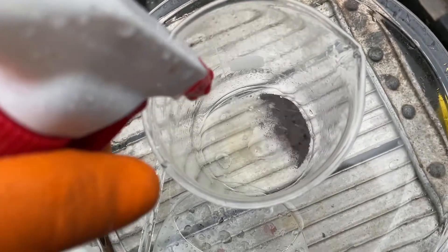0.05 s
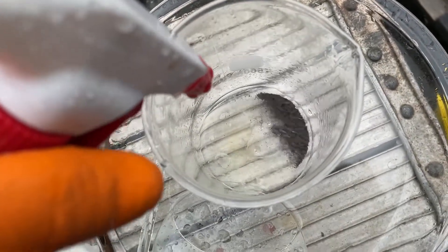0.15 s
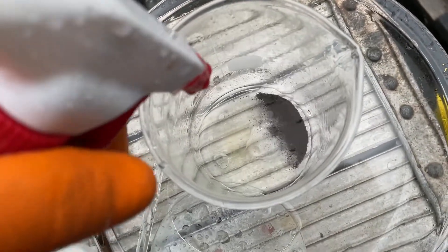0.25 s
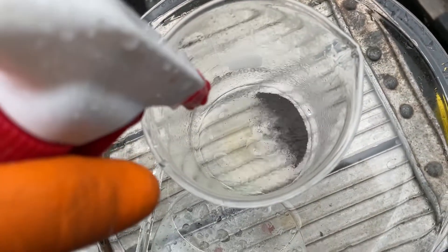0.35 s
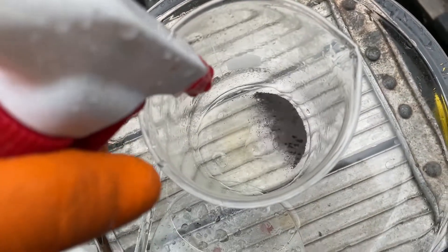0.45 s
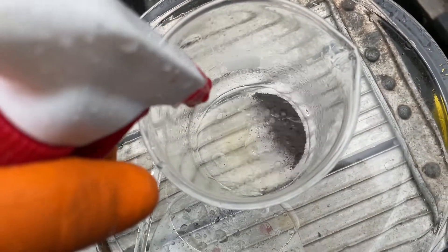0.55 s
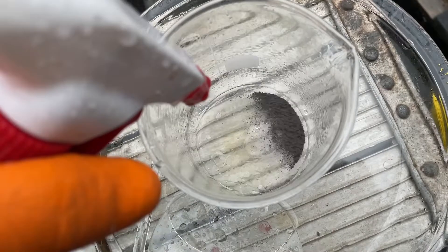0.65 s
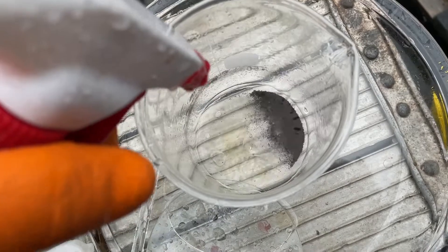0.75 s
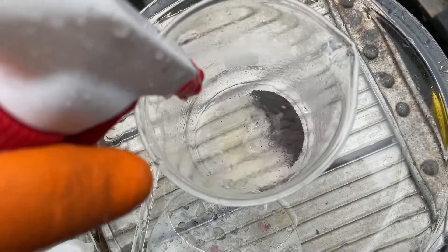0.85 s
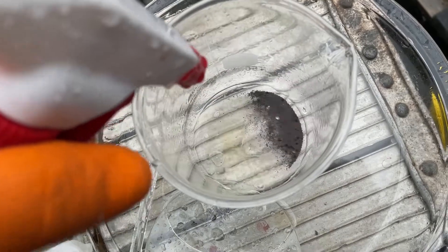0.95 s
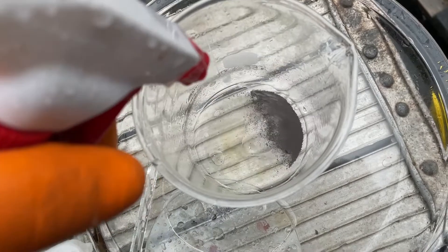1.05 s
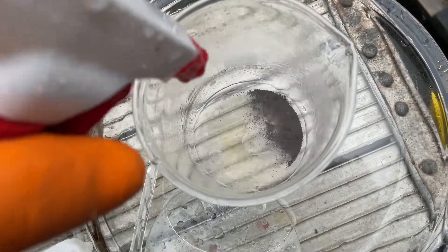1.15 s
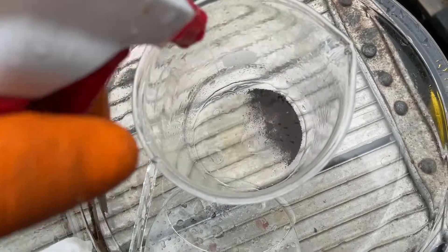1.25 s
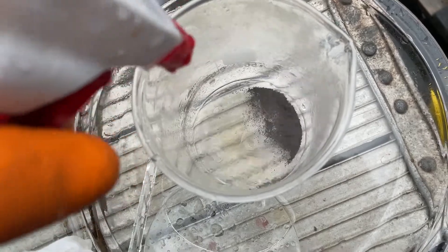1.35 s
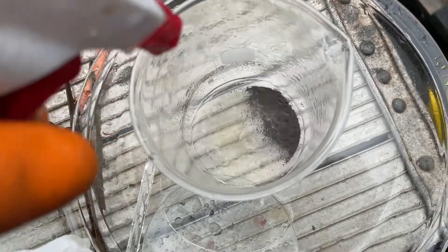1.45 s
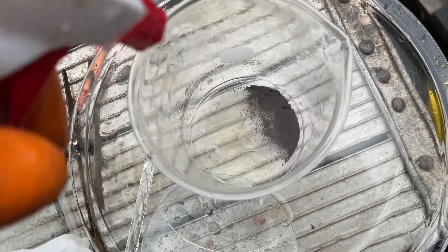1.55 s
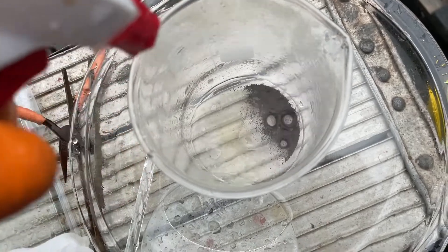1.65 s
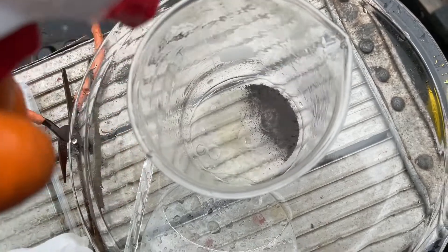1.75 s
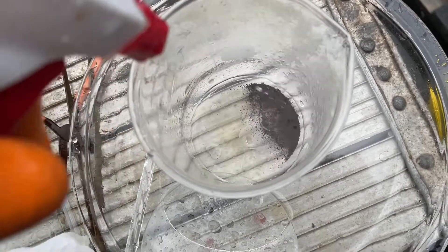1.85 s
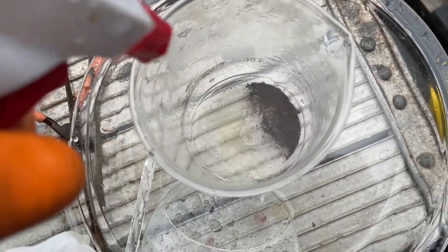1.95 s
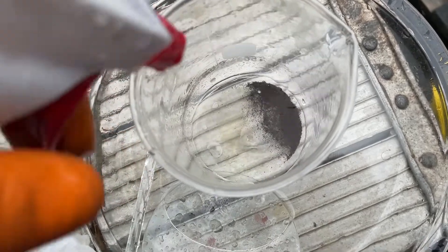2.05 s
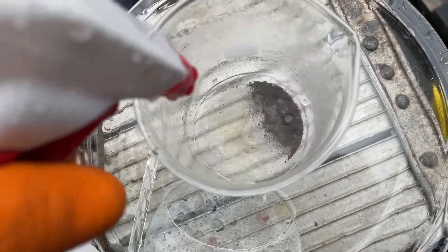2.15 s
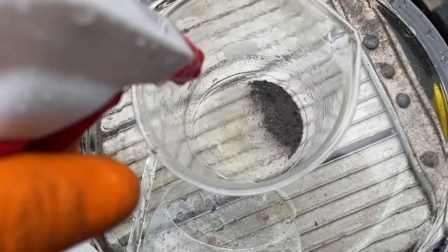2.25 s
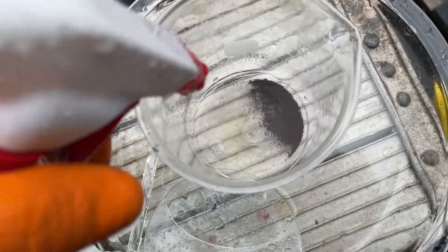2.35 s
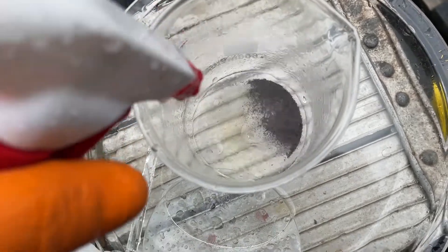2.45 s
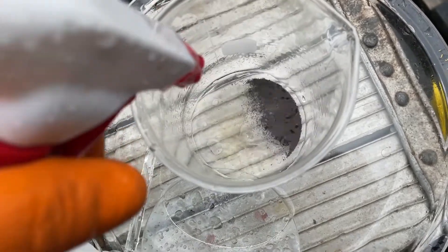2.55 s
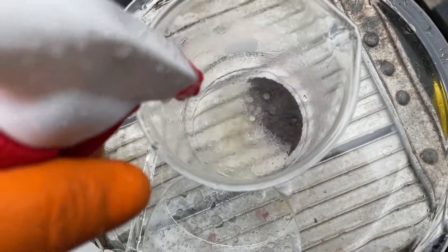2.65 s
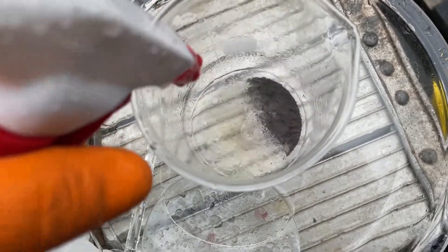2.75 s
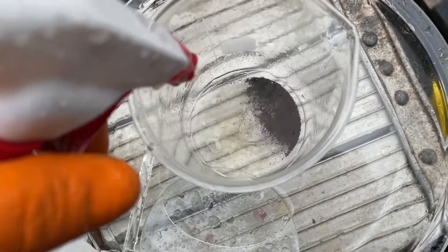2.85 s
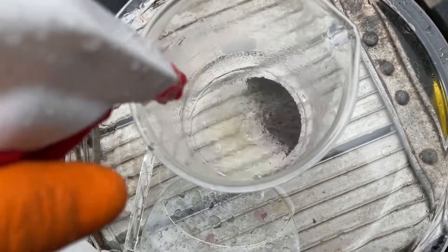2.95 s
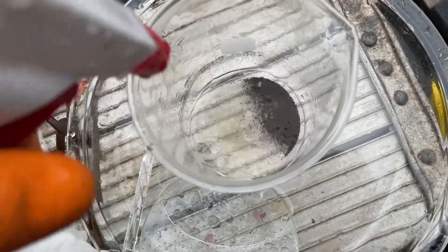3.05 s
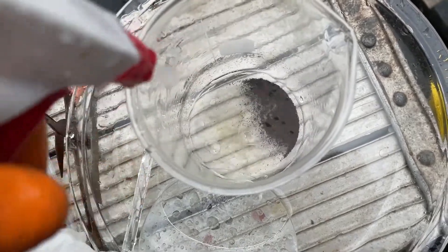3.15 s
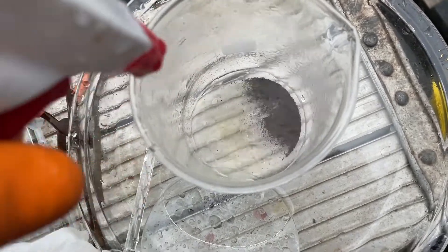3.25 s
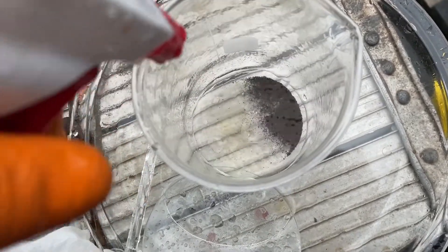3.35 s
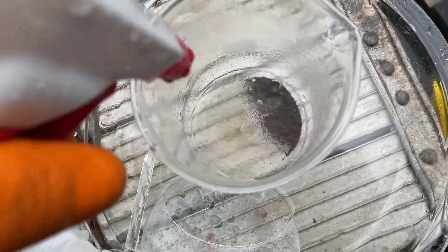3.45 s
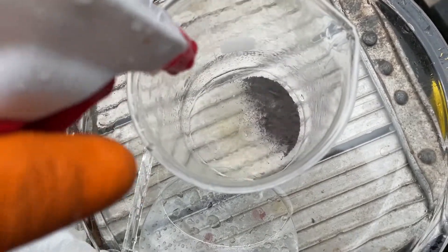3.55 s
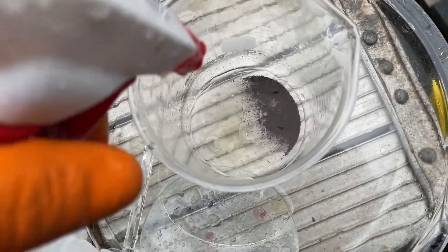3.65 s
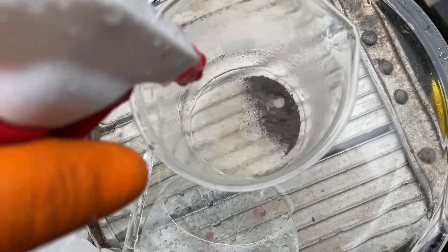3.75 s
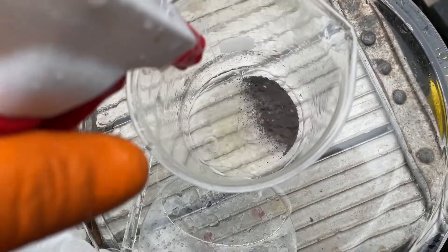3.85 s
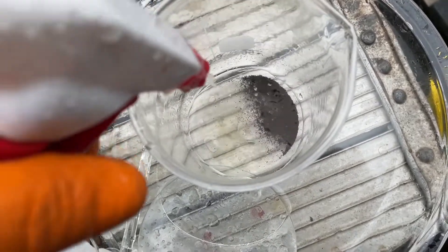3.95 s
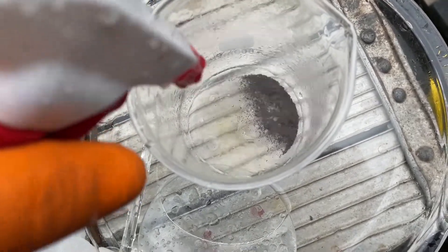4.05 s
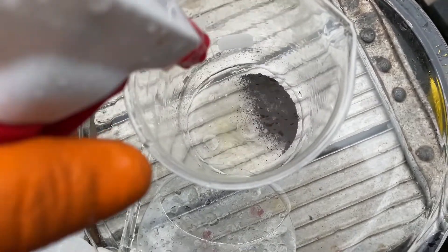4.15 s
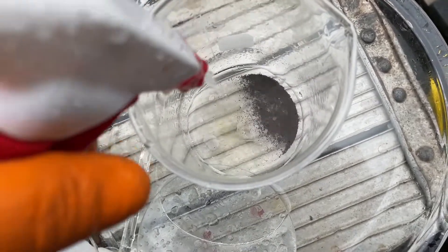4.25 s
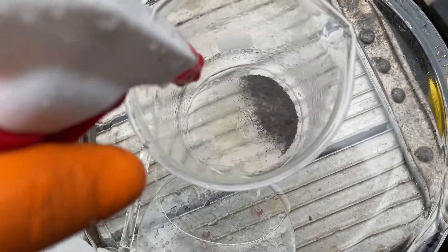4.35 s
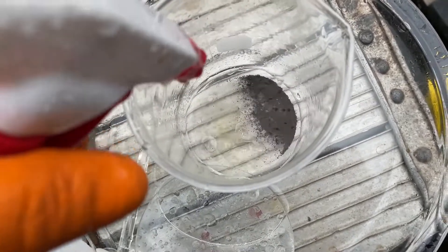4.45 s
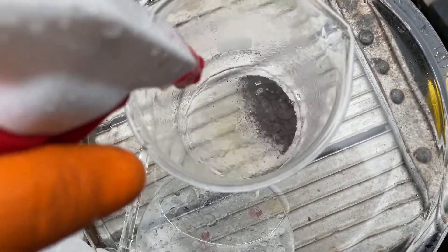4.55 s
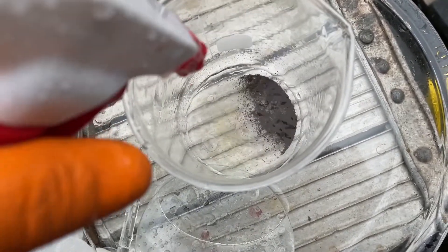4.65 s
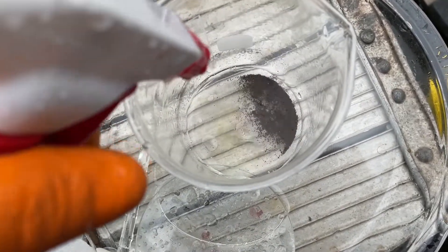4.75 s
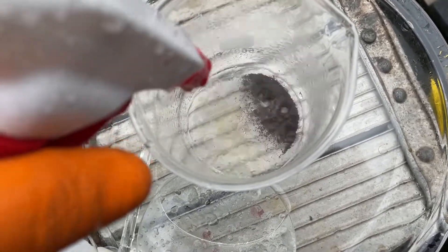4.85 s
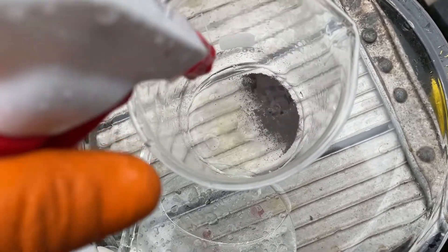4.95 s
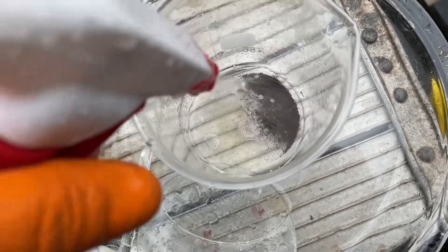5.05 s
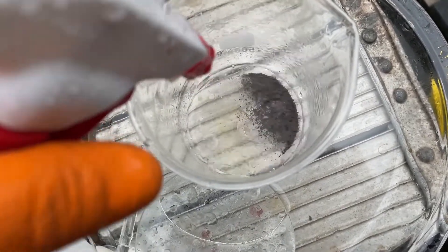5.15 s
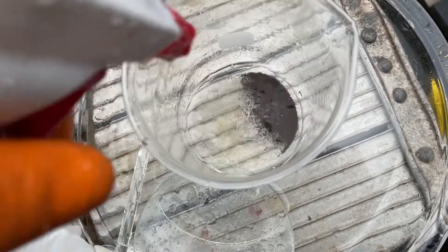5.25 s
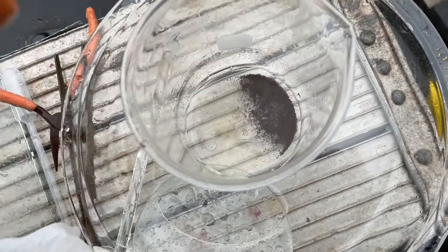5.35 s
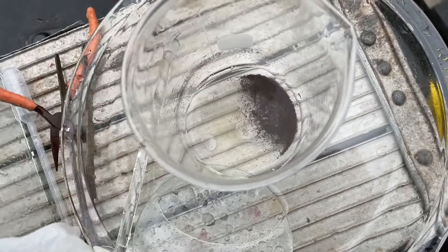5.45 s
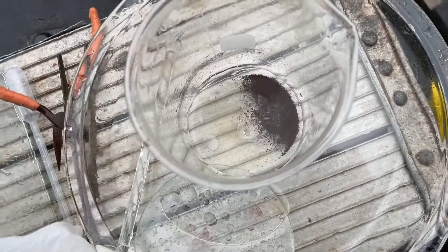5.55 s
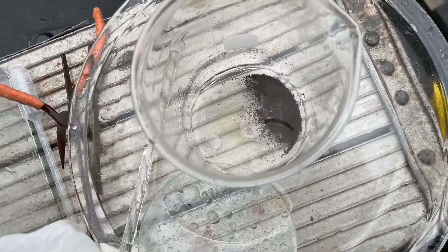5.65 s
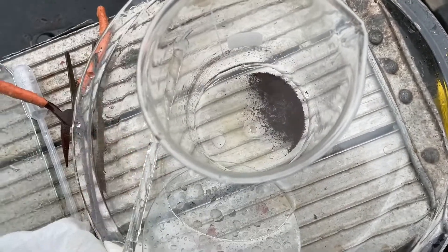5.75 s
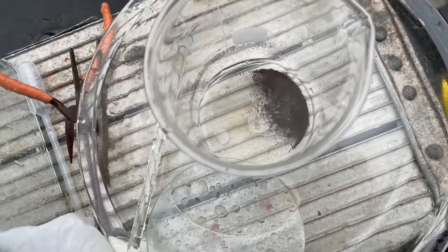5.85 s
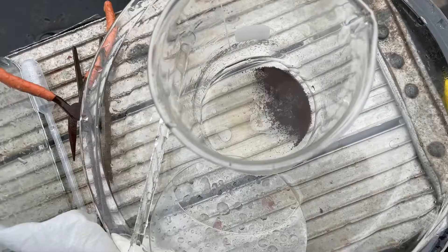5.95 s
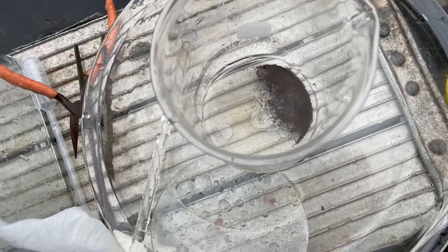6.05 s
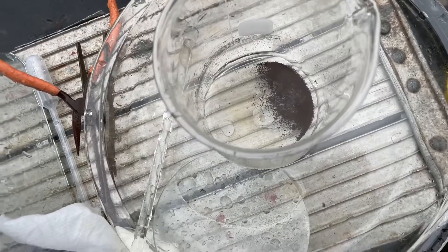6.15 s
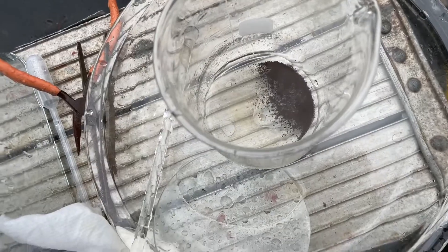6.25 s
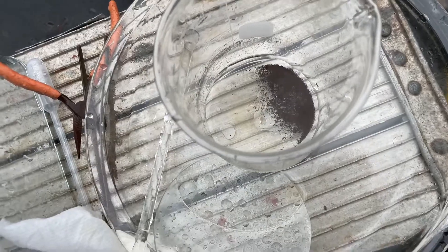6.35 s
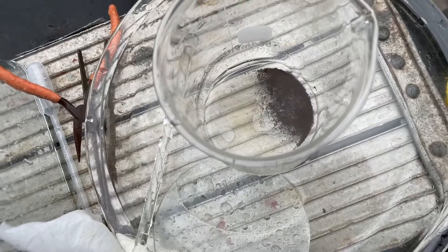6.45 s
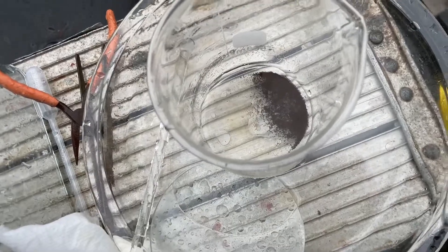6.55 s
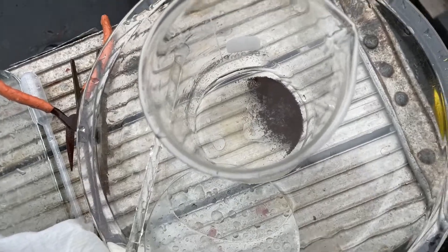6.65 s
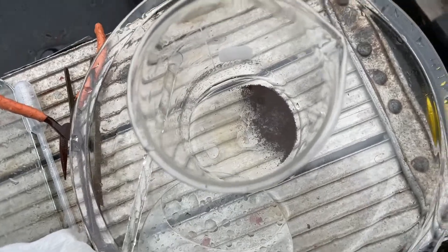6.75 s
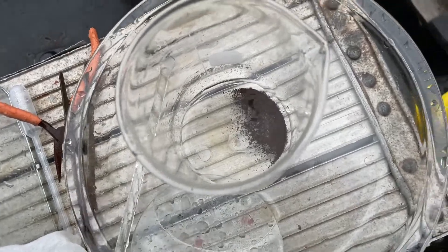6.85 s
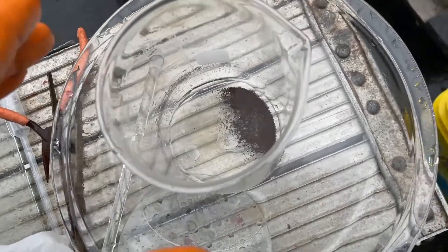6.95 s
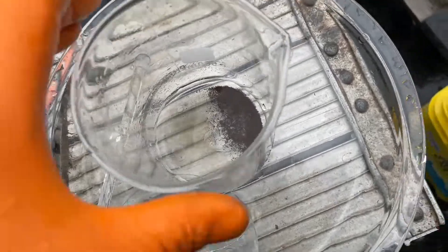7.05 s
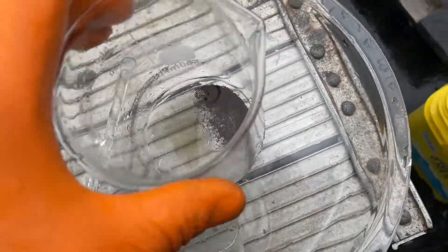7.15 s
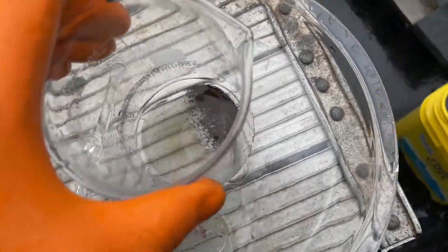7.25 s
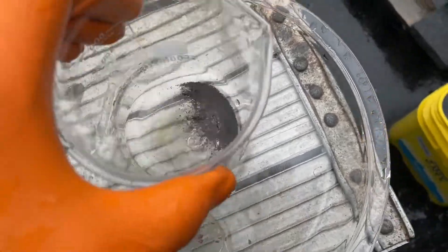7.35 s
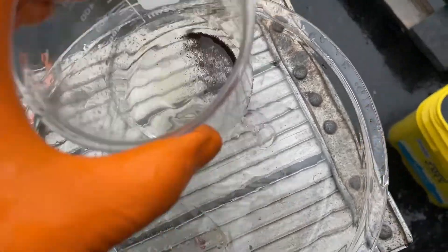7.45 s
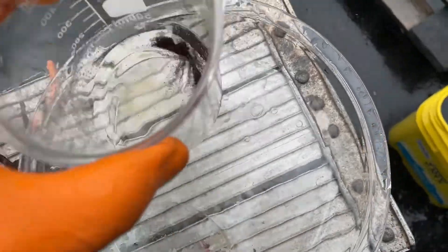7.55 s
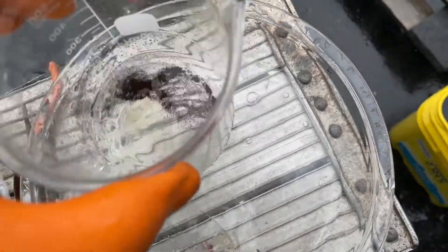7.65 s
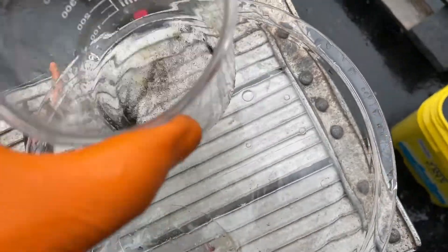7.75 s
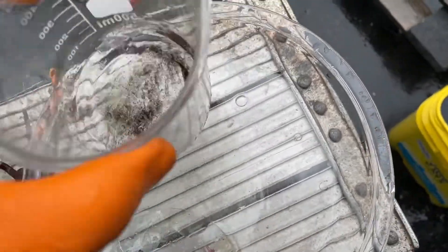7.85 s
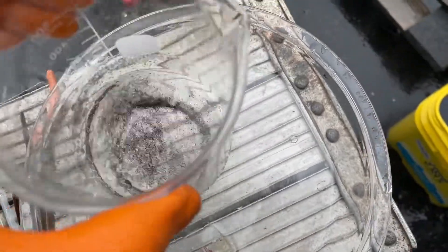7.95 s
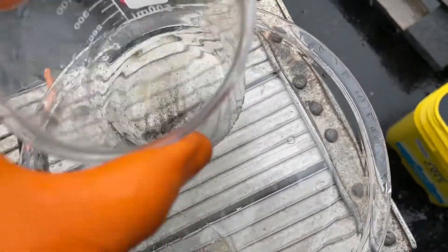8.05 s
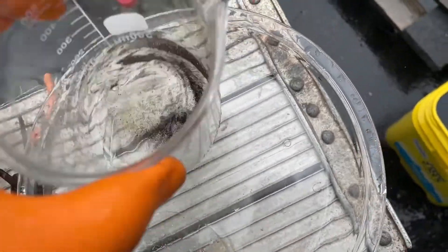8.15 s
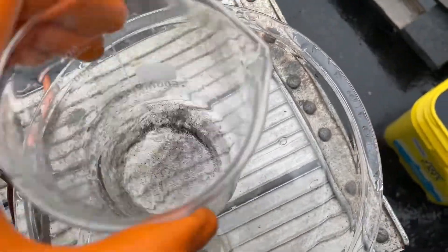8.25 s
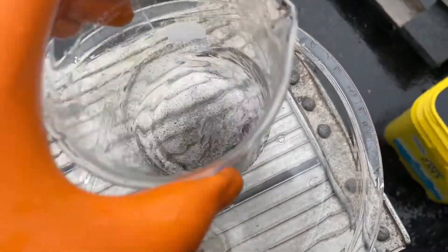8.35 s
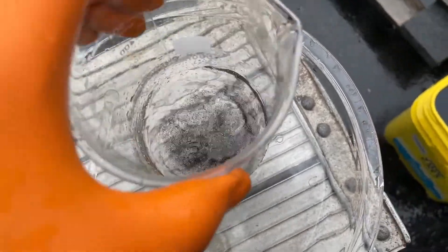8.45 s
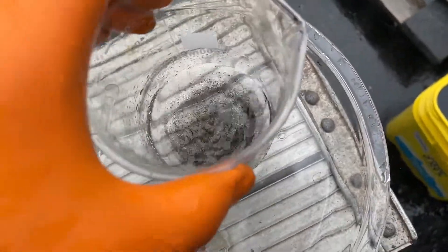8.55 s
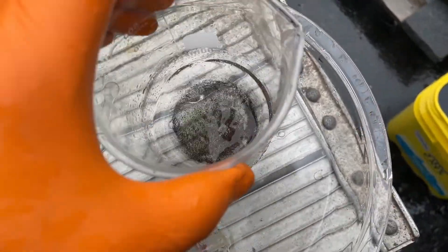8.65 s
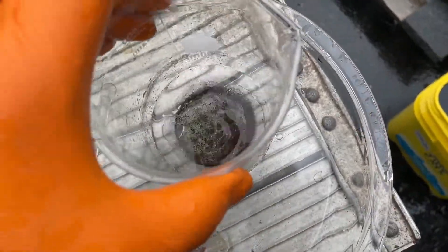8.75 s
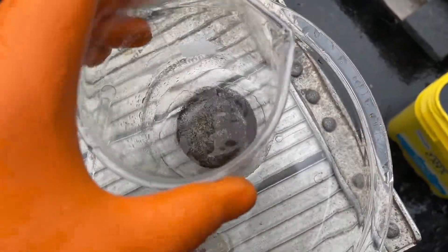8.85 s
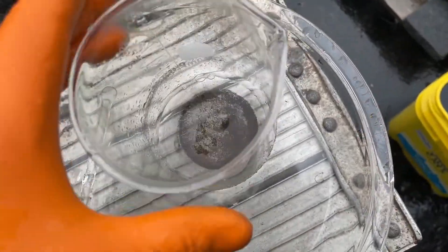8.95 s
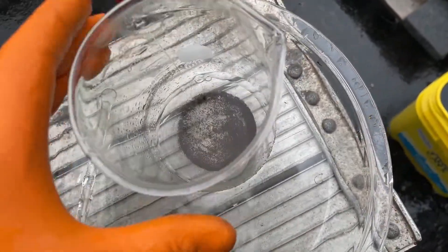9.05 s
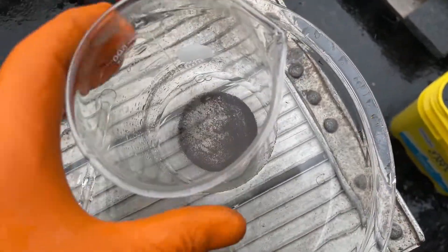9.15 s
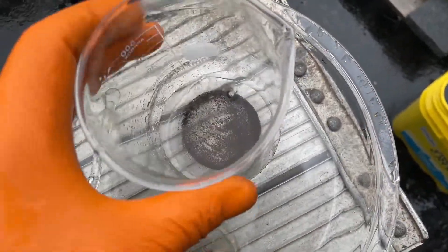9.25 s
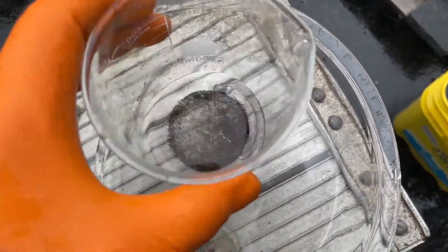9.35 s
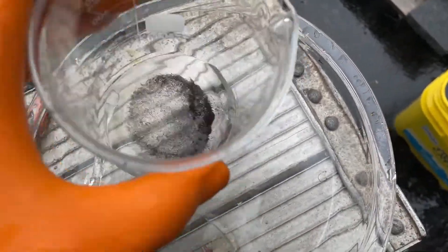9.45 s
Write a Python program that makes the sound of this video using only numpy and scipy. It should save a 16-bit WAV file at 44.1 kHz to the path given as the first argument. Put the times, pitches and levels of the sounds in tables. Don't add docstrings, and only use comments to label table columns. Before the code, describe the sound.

Outdoors with a handheld microphone nearby, fast regular spray bursts fill the first five seconds, hiss mixed with squeaky stick-slip friction, hollow plastic buzz and small clicks. A dull bump on the microphone comes near the end of the spraying. Then a loud clunk and rattle of the bottle on metal, quiet handling ticks, a hard glass knock, and another as the beaker is put down and settles. Low distant traffic continues.

```python
import sys
import numpy as np
from scipy import signal
from scipy.fft import rfft, irfft, next_fast_len
from scipy.io import wavfile
from scipy.ndimage import map_coordinates

SR = 44100
rng = np.random.default_rng(int(sys.argv[2]) if len(sys.argv) > 2 else 0)


def bounce(signal):
    frames = np.transpose(np.atleast_2d(signal))
    limited = np.clip(frames, -1, 1)
    pcm = np.round(limited * 32767).astype(np.int16)
    wavfile.write(sys.argv[1], SR, pcm)


def level_to_linear(level):
    exponent = np.asarray(level, float) / 20
    return 10 ** exponent


N = 418509
TIME = np.arange(N) / SR
SPRAY_N = round(5.5 * SR)

# break-away slip t/s, jet level/dB, bottle drone level/dB, break-away level/dB, push length/s
STROKES = [(0.216, -17, -25.5, -14, 0.081), (0.475, -16, -26.5, -14, 0.075),
           (0.728, -18, -25.5, -14.5, 0.068), (0.9711, -14.5, -25, -14, 0.076),
           (1.232, -15, -25.5, -10.5, 0.077), (1.5011, -15.5, -25, -11.5, 0.083),
           (1.7615, -16, -24.5, -11.5, 0.075), (2.0168, -14.5, -25, -12.5, 0.078),
           (2.284, -15.5, -27, -11.5, 0.072), (2.5454, -15.5, -26.5, -15, 0.069),
           (2.8076, -15.5, -26, -13, 0.066), (3.08, -15, -27, -12.5, 0.076),
           (3.3444, -15.5, -26, -12, 0.085), (3.6195, -16, -24.5, -13, 0.079),
           (3.885, -16, -26, -13, 0.077), (4.183, -17, -26.5, -12.5, 0.074),
           (4.4416, -17.5, -27.5, -13, 0.066), (4.704, -15.5, -27, -11.5, 0.062),
           (4.975, -15.5, -26, -13.5, 0.063)]
LAST_SLIP = [.053, .051, .052, .054, .053, .055, .058, .053, .053, .05, .05, .051, .053, .053, .051, .051,
             .049, .047, .046, .052, .052]
USUAL_S = 0.052
# f/Hz, likeness
NEAR = [(200, .96), (900, .88), (1700, .5), (2300, .8), (3000, .55), (3800, .78), (5000, .45), (5900, .85),
        (7300, .7), (7700, 1), (8700, 1), (9000, .84), (10900, .84), (11200, 1), (12200, 1), (12500, .78),
        (14000, .82), (14400, 1)]
# f/Hz, left lead/rad
ROUND_BODY = [(0, 0), (900, .7), (1550, 3.1), (2000, 5.3), (3100, 7.2), (4000, 6.6), (5800, 6.28)]


def unit(x):
    return x / np.sqrt(np.mean(x ** 2) + 1e-20)


def along(points, hz):
    f, v = np.transpose(points)
    return np.interp(np.log(hz + 1), np.log(f + 1), v)


def wobble(rate):
    knots = rng.standard_normal(int(N * rate / SR) + 4)
    return map_coordinates(knots, [TIME * rate])


def swells(rows):
    return sum(db * np.exp(-((TIME - s) / half) ** 2) for s, db, half in rows)


def step(t, width):
    return 0.5 + 0.5 * np.tanh(t / width)


def filtered(x, response):
    n = x.shape[-1]
    m = next_fast_len(n + 4096)
    return irfft(rfft(x, m) * response(np.fft.rfftfreq(m, 1 / SR)), m)[..., :n]


def noise(response, count=N):
    return unit(filtered(rng.standard_normal((2, count)), response))


def fresh():
    return rng.standard_normal((2, SPRAY_N))


def colour(points):
    return lambda f: level_to_linear(along(points, f))


def resonant(modes):
    def response(f):
        total = 0
        for k, (centre, width, db) in enumerate(modes):
            damping = 1j * f * width
            total = total + (-1) ** k * level_to_linear(db) * damping / (centre * centre - f * f + damping)
        return total
    return response


def steady(x):
    return unit(x / (np.abs(signal.hilbert(x)) + 0.2) ** 0.61)


def bursts(times, db, t60, rise, count):
    start = np.zeros(count)
    np.add.at(start, np.round(times * SR).astype(int), level_to_linear(db))
    t = TIME[:SR // 20]
    shape = level_to_linear(-60 * t / t60) * (1 - np.exp(-t / rise))
    return signal.fftconvolve(start, shape / shape.max())[:count]


def lead(x, points):
    f, rad = np.transpose(points)
    return filtered(x, lambda hz: np.exp(0.5j * np.interp(hz, f, rad) * [[1], [-1]]))


def spread(pair, alike, most=1):
    def mid_side_gains(hz):
        turn = np.arccos(np.clip(along(alike, hz), -1, most)) / 2
        return np.array([np.cos(turn), np.sin(turn)])
    mid, side = filtered(pair, mid_side_gains)
    return np.array([mid + side, mid - side])


def squeezes():
    partial = [
        (-.038, -18.5, -23, -15, 0.088),
        (5.224, -31, -32.5, -40, 0.034),
    ]
    jet, push, scrape, stick, grip = np.zeros((5, SPRAY_N))
    for (s, jet_db, drone_db, _, push_s), last in zip([*STROKES, *partial], LAST_SLIP):
        jet_s = push_s + 0.059
        span = slice(max(round(s * SR) - 4000, 0), round(s * SR) + SR // 4)
        t = TIME[:SPRAY_N][span] - s + 0.0022
        pressure_db = -8 * np.clip(t / jet_s, 0, 2) ** 2.44
        jet[span] += level_to_linear(jet_db - 14 + pressure_db) * step(t - 0.024, 0.02) * step(jet_s - t, 0.026)
        scrape[span] += level_to_linear(-41.5) * step(t + 0.061, 0.0044) * step(-0.015 - t, 0.013)
        since_slip = (t * USUAL_S / last - 0.031) % 0.0115
        stick[span] = np.exp(-since_slip / 0.006) * step(last + 0.011 - t, 0.003)
        grip[span] = step(t - 0.044, 0.0071)
        growth_db = 4 * np.clip(t / push_s - 0.5, -1, 0.5)
        release = step(push_s - t, 0.0051) + 0.036 * step(jet_s - t, 0.033)
        push[span] += level_to_linear(drone_db + growth_db) * step(t - 0.012, 0.0097) * release
    judder = push * (0.3 + 2.3 * stick) * level_to_linear(1.8 * wobble(160))[:SPRAY_N]
    return jet, push, judder, scrape, grip


def jet_hiss(jet):
    # f/Hz, level per Hz/dB
    jet_colour = [(300, 3), (1000, -1), (1800, 1.5), (2500, -2), (4000, -1), (6000, -0.5), (8000, 2.5),
                  (10000, 0), (12000, -5.5), (15500, -6), (16500, -50)]
    flicker = level_to_linear(1.05 * wobble(120) + 1.6 * wobble(600))[:SPRAY_N]
    return jet * flicker * noise(colour(jet_colour), SPRAY_N)


def beaker_air(jet, late):
    flicker = level_to_linear(-13 + 3.6 * wobble(25))[:SPRAY_N]
    return jet * late * flicker * noise(resonant([(601, 26, 0)]), SPRAY_N)


def bottle_wall(push, early, late):
    # f/Hz, width/Hz, level/dB
    loose_wall = [(221.3, 58, 1), (433, 52, -22.5), (493, 50, -16)]
    # f/Hz, width/Hz, level/dB
    gripped_wall = [(195, 31, -1), (312, 43, -5), (485, 42, -13)]

    def wall(modes):
        return steady(noise(lambda f: np.abs(resonant(modes)(f)) ** 1.21, SPRAY_N))
    return level_to_linear(-3.5) * push * (early * wall(loose_wall) + late * wall(gripped_wall))


def trigger_body(slip, judder):
    # f/Hz, width/Hz, level/dB
    trigger_modes = [(2428, 200, 2), (3450, 300, 2), (4180, 350, -1), (5430, 780, -7), (7050, 2300, -7)]
    return filtered((level_to_linear(8.5) * slip + level_to_linear(-0.5) * judder) * fresh(), resonant(trigger_modes))


def pump_head(slip, push, judder, early, late):
    # f/Hz, width/Hz, level/dB
    early_head = [(603, 90, -10.5), (910, 74, 4), (1270, 270, -6)]
    # f/Hz, width/Hz, level/dB
    late_head = [(893, 120, -2), (1030, 130, -0.5), (1246, 176, 2.5)]
    knocked = (level_to_linear(15) * slip * (0.22 + unit(push) / 3) + level_to_linear(4) * judder) * fresh()
    return filtered(early * knocked, resonant(early_head)) + filtered(late * knocked, resonant(late_head))


def lever(slip, push):
    free = 1 - 0.6 * np.minimum(unit(push), 1)
    return filtered(level_to_linear(5) * slip * free * fresh(), resonant([(1340, 255, 6.5), (2130, 300, -10)]))


def slips():
    # clicks home t/s, level/dB, delay until the finger takes up the slack/s, level/dB
    returns = [(0.1587, -23.5, 0.03, -17), (0.413, -22, 0.031, -17), (0.6703, -24, 0.028, -18),
               (0.909, -20.5, 0.037, -13.5), (1.1722, -21, 0.029, -17), (1.439, -21, 0.035, -18),
               (1.708, -19.5, 0.033, -15.5), (1.956, -21, 0.035, -15), (2.2241, -20, 0.03, -15),
               (2.4812, -21, 0.035, -16), (2.7529, -21.5, 0.027, -18), (3.0178, -18.5, 0.036, -16.5),
               (3.29, -20.5, 0.0294, -15), (3.5633, -20, 0.032, -15.5), (3.83, -22.5, 0.027, -18.5),
               (4.1129, -22.5, 0.036, -23), (4.388, -23.5, 0.026, -23), (4.643, -25, 0.017, -33),
               (4.9143, -22, 0.031, -17.5)]
    # t/s, peak level/dB
    scuffs = [(0.172, -24), (0.4297, -26), (0.6879, -30), (0.9256, -23), (1.1864, -24), (1.4586, -26),
              (1.7197, -28), (1.968, -31), (2.241, -28), (2.5052, -26.5), (2.7604, -30), (3.04, -29),
              (3.3106, -24), (3.5862, -25), (3.8477, -25), (4.1294, -28), (4.3954, -31), (4.6613, -32),
              (4.9366, -27)]
    # t/s after the break-away, level under it/dB, part below 7 kHz/dB, scatter/s
    loaded = [
        (0, 0, -8, 0),
        (.012, -8, -3, 0.0006),
        (.0164, -3, -12.5, .0006),
        (.0283, -6, -8.5, 0.0006),
        (.0403, -9.5, -5, .0006),
        (.0505, -9, -4, 0),
    ]
    # t/s, peak level/dB, part below 7 kHz/dB, kind (0 home, 1 slack, 2 loaded)
    strays = [
        (1.405, -22, -14, 0),
        (4.769, -15, -18, 2),
        (5.119, -30, -18, 0),
        (5.147, -33, 0, 1),
        (5.177, -25, -8, 0),
        (5.196, -28, 0, 0),
        (5.237, -14, -10.5, 1),
        (5.26, -36, 0, 0),
    ]
    home, home_db, slack, slack_db = np.transpose(returns)
    s, slip_db = np.transpose(STROKES)[[0, 3]]
    scuff, scuff_db = np.transpose(scuffs)
    one = np.ones(len(s))
    luck = rng.standard_normal((len(s), 8, 2))
    pace = np.array(LAST_SLIP[:len(s)]) / USUAL_S
    rows = [(home, home_db, -9.5 * one, 0 * one),
            (home + slack, slack_db, -9.5 * one, one),
            (scuff, scuff_db - 3, -3 * one, 0 * one)]
    for k, (after, db, low_db, scatter) in enumerate(loaded):
        onset = s + after * pace + scatter * luck[:, k, 0]
        level_db = slip_db + db + (k > 0) * 1.5 * luck[:, k, 1]
        rows.append((onset, level_db, low_db * one, 2 * one))
    s, db, low_db, kind = np.hstack(rows + [np.transpose(strays)])
    low_db = np.minimum(low_db + rng.standard_normal(len(s)), 0)
    high_db = 10 * np.log10(np.clip(1 - level_to_linear(2 * low_db), 0.05, 1))
    clicks = np.array([s, db + low_db, db + high_db])
    return [clicks[:, np.round(kind) == k] for k in range(3)]


def snap_noise():
    # f/Hz, width/Hz, level/dB
    snap_modes = [(8120, 1500, -2.5), (10100, 1150, -1), (12000, 4100, -8.5), (15100, 1140, -5.5)]
    return noise(resonant(snap_modes), SPRAY_N)


def home_clicks(s, low_db, high_db, scrape):
    # f/Hz, width/Hz, level/dB
    home_modes = [(735, 91, -2), (2390, 290, 4), (3030, 400, 1.5), (4180, 1000, -6), (6500, 1800, -7.5)]
    low = level_to_linear(6.5) * bursts(s, low_db, 0.015, 0.00034, SPRAY_N) + level_to_linear(4.5) * scrape
    dull = filtered(snap_noise(), lambda hz: step(12300 - hz, 300))
    snap = level_to_linear(-7) * bursts(s, high_db, 0.025, 0.00026, SPRAY_N) * dull
    return filtered(low * fresh(), resonant(home_modes)) + snap


def slack_clicks(s, low_db, high_db):
    # f/Hz, width/Hz, level/dB
    slack_modes = [(1440, 160, 4), (1930, 120, 1), (2280, 170, 0.5), (2800, 110, 5), (3730, 310, -1),
                   (5470, 630, -3)]
    low = level_to_linear(3.5) * bursts(s, low_db, 0.032, 0.004, SPRAY_N)
    tinted = filtered(snap_noise(), colour([(9000, -2.5), (15000, 5.5)]))
    snap = level_to_linear(-9.5) * bursts(s, high_db, 0.028, 0.003, SPRAY_N) * tinted
    return filtered(low * fresh(), resonant(slack_modes)) + snap


def nozzle_snap(s, high_db):
    return level_to_linear(-5) * bursts(s, high_db, 0.013, 0.0001, SPRAY_N) * snap_noise()


def sprayer():
    # f/Hz, left-right/dB
    lean = [(200, 1), (1300, -1.5), (2500, 2), (4300, 5.5), (5900, 1), (7500, 0)]
    jet, push, judder, scrape, grip = squeezes()
    early, late = np.sqrt(1 - grip), np.sqrt(grip)
    home, slack, (s, low_db, high_db) = slips()
    slip = bursts(s, low_db, 0.01, 0.00023, SPRAY_N)
    body = jet_hiss(jet) + beaker_air(jet, late) + bottle_wall(push, early, late)
    body += trigger_body(slip, judder) + pump_head(slip, push, judder, early, late) + lever(slip, push)
    clicks = home_clicks(*home, scrape) + slack_clicks(*slack) + nozzle_snap(s, high_db)
    near = lead(spread(body, NEAR) + spread(clicks, NEAR, most=0.96), ROUND_BODY)
    near = filtered(near, lambda hz: level_to_linear(along(lean, hz) * [[0.5], [-0.5]]))
    return np.pad(near, ((0, 0), (0, N - SPRAY_N)))


def air():
    # f/Hz, level per Hz/dB
    rumble_colour = [(13, -41), (22, -39), (43, 2.5), (108, 0), (211, -17.5), (237, -11), (333, -15.5),
                     (365, -12.5), (500, -33), (650, -53), (1100, -120)]
    # t/s, level/dB
    traffic = [(0, -48.5), (2, -43), (2.8, -47.5), (4.8, -45), (5.55, -52), (5.9, -51), (6.74, -43.5),
               (7, -47), (8.6, -45), (8.77, -54), (8.94, -43), (9.49, -47)]
    # t/s, level/dB, half length/s
    gusts = [
        (2.06, 2, 0.064),
        (2.2, -3, 0.065),
        (2.34, 7.5, 0.067),
        (2.49, -3, .06),
        (2.68, 5, 0.053),
    ]
    # f/Hz, level per Hz/dB
    hiss_colour = [(200, 9), (500, 7.5), (1200, 5.5), (1800, 3.5), (2400, 3), (4000, -1.5), (6000, -3.5),
                   (7800, -1.5), (10500, -5), (12500, -9), (15500, -5.5), (16200, -45)]
    # t/s, level/dB, half length/s
    rustles = [
        (5.9, 3.5, 0.34),
        (7.1, 1, 0.37),
        (8.87, 5, 0.038),
        (9.18, 2.5, 0.028),
    ]
    # f/Hz, likeness
    far = [(200, .92), (800, .1), (1700, .25), (2500, .48), (5500, .45), (7300, .68)] + NEAR[9:]
    rumble_db = np.interp(TIME, *np.transpose(traffic)) + swells(gusts) + 2 + 1.26 * wobble(9.3)
    rumble = level_to_linear(rumble_db) * noise(colour(rumble_colour))
    hiss_db = -46 + swells(rustles) + 0.55 * wobble(4.8) + 1.85 * wobble(26)
    hiss = level_to_linear(hiss_db) * noise(colour(hiss_colour))
    duck_db = -7 * step(TIME - 8.68, 0.006) * step(8.68 + 0.125 - TIME, 0.036)
    hiss -= (1 - level_to_linear(duck_db)) * filtered(hiss, lambda hz: step(hz - 2500, 300))
    return lead(spread(rumble + hiss, far), ROUND_BODY)


def wind():
    # t/s, level/dB, half length/s
    puffs = [
        (.1, 14, .06),
        (.65, 12, .08),
        (1.05, 25, 0.086),
        (1.55, 14, 0.052),
        (1.85, 16, .1),
        (2.68, 19, 0.099),
        (3.0, 15, .05),
        (3.6, 10, .1),
        (5.05, 15, .06),
        (7.92, 16, 0.059),
    ]
    return level_to_linear(-61 + swells(puffs)) * spread(noise(resonant([(52, 50, 0)])), NEAR)


def bump():
    # t/s, level/dB, first crest/s, stretch per half cycle, fade/s
    jolt = (4.8205, -8.5, .0053, 1.41, .024)
    s, db, crest, stretch, fade = jolt
    t = np.clip(TIME - s, 1e-4, None)
    chirp = np.cos(np.pi * np.log(t / crest) / np.log(stretch))
    return level_to_linear(db) * step(t - 0.82 * crest, 0.0013) * np.exp(-(t / fade) ** 2) * chirp


def strike(out, blows, modes, crack):
    t = TIME[:SR // 2]

    def peak(v, db):
        return level_to_linear(db) * v / np.abs(v).max(1, keepdims=True)

    for s, db, crack_db, contact, low_db in blows:
        body = np.zeros((2, len(t)))
        for hz, level_db, t60 in modes:
            rattles = t60 < 0.5
            flutter = map_coordinates(rng.standard_normal(160), [t * 300])
            flutter_db = 5 * flutter * rattles * np.minimum(t / 0.025, 1)
            shake = map_coordinates(rng.standard_normal(160), [t * 250])
            shake_rad = 0.35 * shake * rattles * np.minimum(t / 0.015, 1)
            phase = rng.uniform(0, 2 * np.pi) + np.array([[0], [np.pi / 2]])
            ring = level_to_linear(level_db + low_db * (hz < 500) + flutter_db - 60 * t / t60)
            body += ring * np.sin(2 * np.pi * hz * t + phase + shake_rad)
        grit = level_to_linear(-60 * t / (6 * contact)) * noise(crack, len(t))
        rise = 1 - np.exp(-(t / (0.42 * contact)) ** 2)
        hit = peak(rise * body, db) + level_to_linear(crack_db) * peak(np.sqrt(rise) * grit, db)
        out[:, round(s * SR):][:, :len(t)] += hit


def knocks():
    # f/Hz, level/dB, t60/s
    set_down = [
        (5.639, -14, 0, 0.005, -8),
        (5.644, -4.5, -6, 0.0064, 6),
        (5.655, -13, -1, .005, 0),
        (5.664, -11.5, 3, 0.0061, -4),
        (5.68, -17, -7, 0.013, -2),
        (5.7, -18.5, -8, 0.0087, 1),
        (5.71, -21, -10, .008, 8),
        (5.733, -24, 8, 0.006, -10),
    ]
    grating = [(90, -1, 0.16), (161, 5.5, 0.066), (260, 4, 0.051), (357, -3.5, 0.11), (604.4, 0, 0.18),
               (1070, -11, 0.28), (1157, 3, 0.055), (1391, -7, 0.085), (1536, 0, 0.087), (1795, 0, 0.08),
               (2470, -4, 0.045), (4380, -9, 0.07), (5620, -7, 0.039), (6870, -13, 0.064)]
    lift = [
        (7.126, -14, -1, 0.022, -8.5),
        (7.1335, -1.5, -12.5, 0.0073, -8.5),
    ]
    beaker = [(250, -20, 0.13), (359, -18, 0.11), (588, -5, 0.052), (850, -14, 0.021), (1074, -20, 0.18),
              (1180, 15, 0.014), (1552, 0.5, 0.037), (1980, -6, 0.031), (2270, -9, .03),
              (2500, 11.5, 0.017), (2940, -4.5, 0.036), (3980, -13, 0.029), (5540, -11, 0.023)]
    put_back = [
        (8.626, -32, 2, 0.022, 0),
        (8.644, -0.5, -12, 0.0046, -2),
        (8.655, -19.5, 1, 0.008, 0),
    ]
    base = [(257, -12, 0.077), (375, -14.5, 0.055), (609, -2.5, 0.037), (900, -11, 0.036),
            (1130, -17.5, 0.15), (1336, 5, 0.028), (1638, -9.5, 0.065), (2163, 7.5, 0.018),
            (2326, 6.5, 0.021), (3160, -5, .015), (4480, -24, 0.034), (5480, -15, .02), (6900, -25, 0.099),
            (9900, -10, 0.027)]
    settle = [
        (8.81, -26, -5.5, 0.016, -10),
        (8.851, -11.5, -8, 0.0035, -2),
    ]
    dish = [(268, -8.5, 0.15), (370, -13, 0.11), (580, 5.5, 0.029), (680, -12.5, 0.11), (888, -13, .04),
            (1140, 1, 0.041), (1540, -8, 0.043), (2000, -9, 0.023), (2690, -7, 0.022)]
    # t/s, peak level/dB, f/Hz, t60/s, crack level/dB
    ticks = [(5.355, -36, 960, 0.04, -3), (5.355, -32.5, 1850, 0.03, -5), (5.365, -41, 1690, .03, 0),
             (5.733, -21, 1590, .06, -20), (5.795, -36, 1060, .1, -20), (5.823, -42, 1060, .08, -20),
             (6.642, -40, 2400, .008, 19), (9.12, -44, 1500, .02, 4), (9.15, -43, 2300, .02, 4),
             (9.185, -44, 1200, .02, 6), (6.795, -41, 6500, .012, 10), (5.815, -38, 2500, .02, 5),
             (5.934, -41.5, 4750, 0.013, 18.5), (6.073, -39, 440, 0.014, 12), (6.496, -42, 6050, 0.058, 11),
             (6.641, -21, 740, 0.017, 0), (6.739, -40, 2000, .015, -1), (6.964, -49, 2900, 0.014, 15),
             (7.037, -37, 1170, 0.044, -7), (7.107, -32, 2800, 0.035, 1), (7.116, -31, 2550, 0.062, 6),
             (7.267, -30.5, 1387, 0.048, -1), (7.266, -31, 11000, 0.016, -14), (7.266, -44, 4350, .02, -10),
             (7.565, -42, 830, 0.024, 7), (8.373, -19, 9700, 0.022, -1)]
    glass = (8.88, -43, 888, 1.1, -30)
    # f/Hz, level per Hz/dB
    crack_colour = [(150, -11), (500, -6.5), (1200, -2.5), (2500, -6.5), (3500, -14), (8000, -15.5),
                    (15500, -29.5)]
    # f/Hz, t60/s
    yard = [(200, 0.75), (1200, 0.15), (4000, 0.071), (12000, 0.076)]
    direct = np.zeros((2, N + SR))
    for blows, modes in [(set_down, grating), (lift, beaker), (put_back, base), (settle, dish)]:
        strike(direct, blows, modes, colour(crack_colour))
    for s, db, hz, t60, crack_db in [*ticks, glass]:
        strike(direct, [(s, db, crack_db, 0.002, 0)], [(hz, 0, t60)], resonant([(1.4 * hz, 2 * hz, 0)]))
    hz, t, z = signal.stft(rng.standard_normal((2, SR // 2)), SR, nperseg=256)
    decay = level_to_linear(-60 * t / along(yard, hz)[:, None])
    tail = signal.istft(z * decay, SR, nperseg=256)[1]
    wet = signal.oaconvolve(direct, tail / np.linalg.norm(tail[0]), axes=1)
    return spread(direct[:, :N] + level_to_linear(-17) * wet[:, :N], NEAR, most=0.89)


def bubbles():
    # t/s, level/dB, first f/Hz, last f/Hz, length/s
    escapes = [
        (6.79, -49, 1000, 1300, .045),
        (7.278, -48, 850, 1300, 0.046),
    ]
    out = np.zeros(N)
    for s, db, first_hz, last_hz, length in escapes:
        u = np.clip((TIME - s) / length, 0, 1)
        cycles = length * (first_hz * u + (last_hz - first_hz) * u ** 2 / 2)
        out += level_to_linear(db) * np.sin(np.pi * u) * np.sin(2 * np.pi * cycles)
    return out


def scene():
    return sprayer() + air() + wind() + bump() + knocks() + bubbles()


def band_limit(x):
    return signal.sosfilt(signal.butter(12, 17150, fs=SR, output="sos"), x)


def record(dry):
    # f/Hz, left lead/half turns
    port_lead = [(5800, 0), (7000, -.4), (7700, -1), (8700, -1), (9200, -1.3), (11200, -2), (12200, -2),
                 (12700, -2.3), (14400, -3)]
    ports = lead(dry, np.array(port_lead) * [1, np.pi])
    band = filtered(ports, lambda hz: step(16600 - hz, 250))
    soft = band / (1 + np.abs(band / 0.93) ** 6) ** (1 / 6)
    return band_limit(soft)


dry = scene()
out = record(dry)
bounce(out)
```